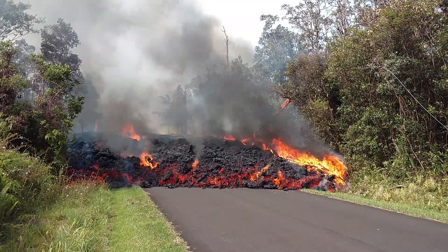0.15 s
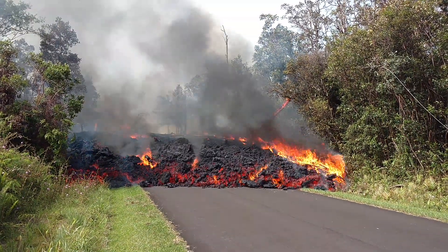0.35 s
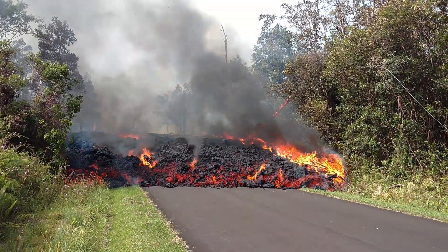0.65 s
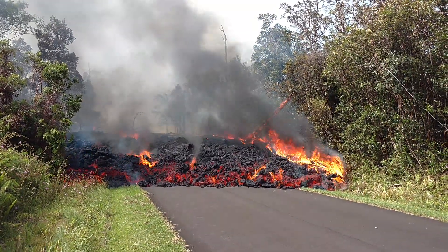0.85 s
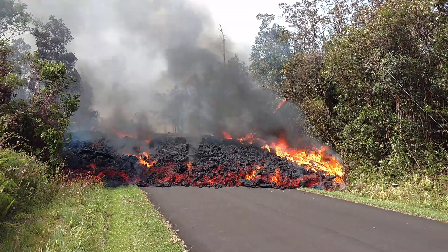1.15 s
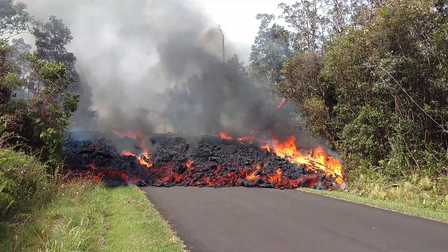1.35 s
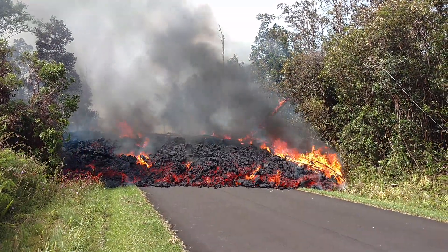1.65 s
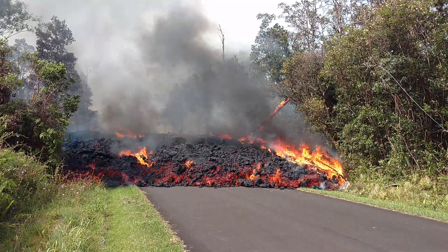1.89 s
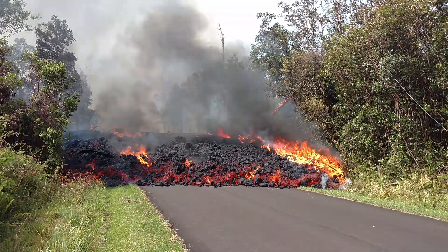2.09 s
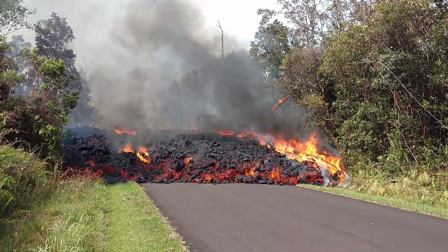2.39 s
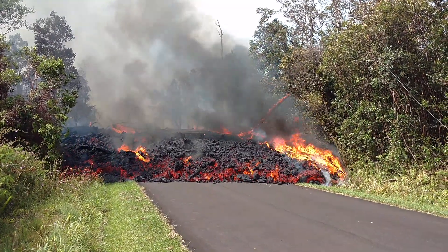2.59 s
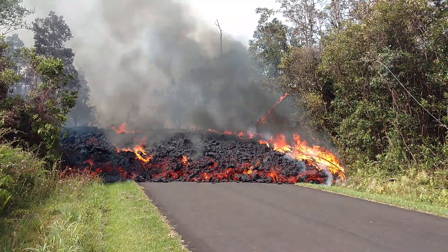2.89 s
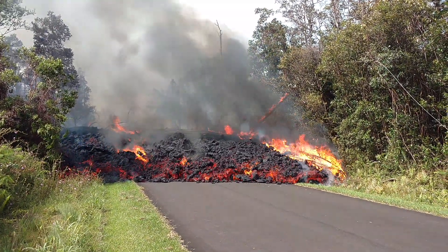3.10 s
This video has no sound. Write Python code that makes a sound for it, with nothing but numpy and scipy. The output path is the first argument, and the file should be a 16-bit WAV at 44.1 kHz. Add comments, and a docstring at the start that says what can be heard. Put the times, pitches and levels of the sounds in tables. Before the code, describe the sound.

Fire at the edge of a lava flow gives a flickering bright hiss and muffled roar, peppered with irregular clicks, snaps and dull pops, while wind rumbles mostly on the right; open air, wide stereo microphone.

```python
"""A fire roars softly and hisses as a lava flow creeps across a country road and burns the brush at its edge.
Flickering bands of noise make the roar and hiss; wind rumbles and buffets the right microphone port.
Resonant clicks crackle, noise bursts snap as twigs, and short wavering tones with puffs of noise pop as gas.
Foliage scatters these cracks; the recorder widens the stereo by subtracting each port from the other."""
import sys
import numpy as np
from scipy import signal
from scipy.fft import rfft, irfft, next_fast_len
from scipy.io import wavfile

SR = 44100
rng = np.random.default_rng(int(sys.argv[2]) if len(sys.argv) > 2 else 0)


def transcribe(signal):
    """Save signal, clipped to [-1, 1], as a 16-bit WAV file at the path in sys.argv[1]."""
    frames = np.atleast_2d(signal).T
    limited = np.clip(frames, -1, 1)
    pcm = np.round(limited * 32767).astype(np.int16)
    wavfile.write(sys.argv[1], SR, pcm)


N = 142884

# Level of the hiss and roar, dipping abruptly after some sharp clicks and recovering,
# before the two offsets below: time_s, hiss_level_db, roar_level_db
FIRE_LEVEL = [(0, -39.5, -42.5), (0.06, -39, -46), (0.12, -42, -46), (0.19, -35.5, -40),
              (0.32, -42.5, -43.5), (0.45, -40, -41), (0.62, -38.5, -39.5), (0.82, -34.5, -36.5),
              (1.02, -36, -40.5), (1.07, -40.5, -41), (1.25, -37, -40.5), (1.58, -34, -38),
              (1.815, -37, -42), (1.84, -42, -43.5), (2.1, -39.5, -41), (2.445, -39, -42), (2.47, -43, -46),
              (2.8, -41.5, -42.5), (3.14, -36.5, -39.5), (3.24, -37, -41.5)]
HISS_OFFSET_DB, ROAR_OFFSET_DB = -3, -3
# Relative noise density of the hiss: frequency_hz, density_db (per Hz)
HISS_SPECTRUM = [(1200, -13), (2000, -8.5), (2500, -1), (3100, 2), (4200, -1.5), (6500, 0.5), (9000, -3.5),
                 (10600, -5.5), (13500, -8), (15500, -17)]
# Relative noise density of the roar: frequency_hz, density_db (per Hz)
ROAR_SPECTRUM = [(40, -27), (110, 14.5), (250, -2.5), (520, 9), (760, 1.5), (1030, 2), (1300, -1),
                 (1580, 1), (1950, -1.5), (3000, -85)]
# Likeness of the fire noise at the two ports: frequency_hz, coherence (no unit)
PORT_COHERENCE = [(100, 0.73), (550, 0.98), (1000, 0.77), (1600, 0.1), (2400, 0.016), (3000, 0.13),
                  (4300, 0.012), (15000, 0.011)]

# Relative noise density of the wind rumble: frequency_hz, density_db (per Hz)
WIND_SPECTRUM = [(25, -41), (50, -2), (100, 3.5), (170, 3.5), (280, -5.5), (450, -22.5), (800, -39),
                 (2000, -34)]
# Strength of the moving air at the right port, before its flutter: time_s, level_db
BREEZE_LEVEL = [(0, -33.5), (.5, -29), (.9, -32.5), (1.15, -27.5), (1.35, -32), (1.55, -35), (1.98, -43),
                (2.08, -32), (2.23, -31.5), (2.37, -34), (2.52, -44.5), (2.72, -42), (2.79, -39.5),
                (2.94, -40.5), (3.05, -34.5), (3.24, -38.5)]
WIND_FLUTTER_DB, WIND_FLUTTER_HZ = 2.5, 38
WIND_LEFT_DB = -8   # left port relative to right

CRACKLES_PER_S, CRACKLE_CYCLES = 600, 9.6   # mean rate; bandwidth is 2 * pitch / cycles
CRACKLE_DB = -11   # relative to the hiss curve
CRACKLE_SPREAD_DB, CRACKLE_TILT_DB = 3.5, -3.5   # mean excess of size; slope per octave
ECHO_DB, ECHO_DECAY_S, ECHO_RISE_S, ECHO_HZ = -17.5, 0.047, 0.0017, 5050   # scatter from the trees

# Twigs snapping: start_s, level_db (relative), centre_hz, splintering_s (decay before the resonance)
TWIG_SNAPS = [(0.019, -32.5, 7000, 0.0011), (.037, -28.5, 8400, 0.0012), (0.065, -35, 6300, 0.0046),
              (0.1466, -32, 8400, 0.00061), (0.1969, -20, 1990, 0.0002), (.55, -32.5, 3840, 0.0043),
              (0.76, -31.5, 3660, 0.0087), (1.028, -25, 3740, 0.0032), (1.3058, -28, 2650, 0.0016),
              (1.41, -28.5, 3300, 0.0044), (1.556, -25.5, 7550, 0.0011), (1.613, -26, 7600, 0.00076),
              (1.73, -26, 7060, 0.0008), (1.8253, -20.5, 4400, 0.00038), (1.8802, -23.5, 4140, 0.00037),
              (2.2474, -24, 5000, 0.00025), (2.2642, -20, 3800, 0.00013), (2.4552, -26.5, 6230, 0.0004),
              (2.7433, -31.5, 6300, .0004), (3.1975, -18, 2520, 0.0006)]
SNAP_WIDTH = 1   # bandwidth as a share of the centre frequency
SNAP_CLICK_DB = 10.5   # the first break over the initial splinter noise
SNAP_PAN_DB, SNAP_LAG_S = 9.5, 0.00014   # loss and delay at the right port

# Eddies striking the right port: middle_s, level_db (before BUFFET_DB and flutter),
# centre_hz (before its wobble), half_length_s (standard deviation of the swell)
EDDY_BUFFETS = [(0.035, -23, 117.6, 0.0064), (0.063, -21, 174, 0.0057), (0.088, -20, 117, 0.0048),
                (0.249, -25, 182, 0.0073), (0.271, -10.5, 181, 0.0032), (0.304, -21.5, 234, 0.0048),
                (0.317, -17.5, 164, 0.0055), (0.333, -20, 159.7, 0.0083), (0.403, -28.5, 190, 0.0096),
                (0.44, -18.5, 222, 0.005), (0.478, -17.5, 194.4, 0.0032), (0.522, -22.5, 122.4, 0.015),
                (0.599, -21, 166, 0.0087), (0.666, -27, 100, 0.0085), (0.714, -17, 105, 0.0051),
                (0.835, -17, 121.7, 0.0087), (0.964, -17, 262, 0.0032), (0.978, -13.5, 149, 0.0056),
                (1.037, -17, 201, 0.0023), (1.052, -24, 169, 0.0081), (1.219, -14, 236.5, 0.00081),
                (1.238, -19, 158.4, 0.013), (1.272, -14.5, 213, .0035), (2.066, -31, 182, 0.0074),
                (2.09, -24, 221, 0.0027), (2.112, -18, 156, .005), (2.182, -18.5, 133, .005),
                (2.216, -16.5, 146.4, 0.0083), (2.27, -31.5, 189, 0.0093)]
BUFFET_DB, BUFFET_FLUTTER_DB, BUFFET_FLUTTER_HZ = 3.5, 1.8, 190
BUFFET_WOBBLE, BUFFET_WOBBLE_HZ = 0.59, 232   # limit of the pitch's log ratio; its rate
BUFFET_LOW_HZ = 73   # high-pass corner

# Gas pockets and green wood popping: start_s, level_db (before the ring and puff offsets),
# pitch_hz (before its waver), decay_s
GAS_POPS = [(0.307, -23, 880, 0.0024), (0.495, -33, 1534, 0.0096), (.714, -21, 1120, 0.0037),
            (0.7506, -21, 1020, 0.0045), (0.915, -29.5, 1000, 0.0047), (1.41, -24.5, 935, 0.0024),
            (1.418, -23.5, 3150, 0.0062), (1.419, -28.5, 6500, 0.0061), (1.932, -21, 940, 0.0025),
            (1.934, -28.5, 1540, 0.0074), (1.933, -31, 4020, 0.014), (1.971, -32.5, 1407, 0.0084),
            (2.206, -23, 660, 0.0029), (2.657, -30.5, 940, 0.0018), (3.1975, -19.5, 700, 0.0012)]
POP_RING_DB, POP_PUFF_DB = -3.5, -14.5
POP_WAVER_HZ, POP_WAVER_RATE_HZ = 68, 66   # rms depth; rate
POP_PUFF_WIDTH = 0.48   # bandwidth as a share of the pitch

PORT_LAG = 17   # samples of travel between the ports
# Subtraction of the opposite port: frequency_hz, share (no unit)
CROSSFEED_SHARE = [(100, 0.69), (1200, 0.8), (2300, 1), (2900, 1), (5200, 0.52), (9000, 0.53),
                   (13000, 0.37)]
# Colour of the two channels: frequency_hz, left_minus_right_db
CHANNEL_COLOUR = [(550, 0), (780, 2), (1100, 0), (2100, -2), (2400, 0), (2800, 0), (3200, -2), (4400, 3),
                  (5200, .3), (8500, 3), (10400, 1)]
CUTOFF_HZ = 15200


def from_db(db):
    """Amplitude ratio: 20 dB is a factor of ten."""
    return 10 ** (np.asarray(db) / 20)


def rms_one(x):
    """Normalization: the root mean square becomes 1."""
    return x / np.sqrt(np.mean(x ** 2) + 1e-20)


def in_time(rows):
    """Linear interpolation: each column of a curve at every sample."""
    s, *columns = np.transpose(rows)
    return [np.interp(np.arange(N) / SR, s, column) for column in columns]


def at_hz(points, hz):
    """Spectral interpolation: straight lines on a log-frequency axis."""
    point_hz, values = np.transpose(points)
    return np.interp(np.log(hz), np.log(point_hz), values)


def drift(rate_hz):
    """Low-pass noise: a smooth random wander with spread about 1."""
    step, settling = 40, 2000   # the wander is drawn every 40 samples
    r = np.exp(-2 * np.pi * rate_hz * step / SR)
    white = rng.standard_normal(N // step + settling + 2)
    slow = signal.lfilter([1], [1, -2 * r, r * r], white)[settling:]
    return np.interp(np.arange(N) / step, np.arange(len(slow)), rms_one(slow))


def resonate(x, hz, width_hz):
    """Resonance: a pole pair rings at one frequency, with a peak gain near 1."""
    r = np.exp(-np.pi * width_hz / SR)
    zeros = np.array([1, 0, -1]) * (1 - r * r) / 2
    poles = [1, -2 * r * np.cos(2 * np.pi * hz / SR), r * r]
    return signal.lfilter(zeros, poles, x + 1e-18)


def add(out, s, sound):
    """Superposition: a short sound is summed in at its start time."""
    i = max(int(s * SR), 0)
    out[..., i:i + sound.shape[-1]] += sound[..., :max(N - i, 0)]


def fire_noise(spectrum, flicker_db, flicker_hz, shared):
    """Turbulent combustion: partly coherent third-octave noise flickers, partly in unison; rms 1."""
    out, together = 0, drift(flicker_hz)
    edges = 16000 / 2 ** (np.arange(27, -1, -1) / 3)
    white = rng.standard_normal((2, 2, N))   # neighbouring bands use independent pairs
    for k, (low, high) in enumerate(zip(edges, edges[1:])):
        hz = np.sqrt(low * high)
        if not spectrum[0][0] < hz < spectrum[-1][0]:
            continue
        band = signal.butter(2, [low, high], "band", fs=SR, output="sos")
        mid, side = signal.sosfilt(band, white[k % 2])
        alike = np.clip(at_hz(PORT_COHERENCE, hz), -1, 1)
        flicker = shared * together + drift(flicker_hz)
        gain = from_db(at_hz(spectrum, hz) + flicker_db * flicker)
        ports = np.sqrt(1 + alike) * mid + np.sqrt(1 - alike) * side * [[1], [-1]]
        out = out + gain * ports
    return rms_one(out)


def wind_rumble():
    """Turbulent pressure: low-frequency noise fluctuates with the breeze, stronger at the right port."""
    hz = np.maximum(np.fft.rfftfreq(N, 1 / SR), 1)
    spectrum = rfft(rng.standard_normal((2, N))) * from_db(at_hz(WIND_SPECTRUM, hz))
    rumble = rms_one(irfft(spectrum, N))
    breeze_db = in_time(BREEZE_LEVEL)[0] + WIND_FLUTTER_DB * drift(WIND_FLUTTER_HZ)
    return rumble * from_db(breeze_db) * from_db([[WIND_LEFT_DB], [0]])


def crackle():
    """Impulse excitation: many tiny fractures ring at varied pitches, sizes and directions; rms 1."""
    out, count, pitches = np.zeros((2, N)), 400, 20
    for hz in np.geomspace(900, 12000, num=pitches):
        chance, when, where, sign = rng.random((4, count))
        excess = np.minimum(rng.exponential(1, count), 4.5)
        size = from_db(CRACKLE_SPREAD_DB * excess) * np.sign(sign - .5)
        size *= chance < CRACKLES_PER_S * N / SR / pitches / count   # the rest stay silent
        i = (when * (N - 2 * PORT_LAG)).astype(int) + PORT_LAG
        lag = ((2 * where - 1) * PORT_LAG).astype(int)
        clicks = np.zeros((2, N))
        clicks[0, i] = size
        clicks[1, i + lag] = size
        tilt = from_db(CRACKLE_TILT_DB * np.log2(hz / 1000))
        out += resonate(clicks, hz, 2 * hz / CRACKLE_CYCLES) * tilt
    return rms_one(out)


def tree_scatter(x):
    """Diffuse scattering: foliage on both sides returns a short, dull, decaying tail."""
    t = np.arange(SR // 2) / SR
    envelope = np.exp(-t / ECHO_DECAY_S) * (1 - np.exp(-t / ECHO_RISE_S))
    tail = rng.standard_normal((2, len(t))) * envelope
    tail = signal.sosfilt(signal.butter(1, ECHO_HZ, fs=SR, output="sos"), tail)
    tail /= np.sqrt(np.sum(tail ** 2) / 2)
    return from_db(ECHO_DB) * signal.fftconvolve(x, tail, axes=1)[:, :N]


def burst(hz, width, decay_s, click=0):
    """Sudden release: an impulse and dying noise excite one resonance of normalized energy."""
    t = np.arange(SR // 10) / SR
    push = rng.standard_normal(len(t)) * np.exp(-t / decay_s)
    push[0] -= click
    sound = resonate(push, hz, width * hz)
    energy = max(decay_s, .001) * SR
    return sound * np.sqrt(energy / np.sum(sound ** 2))


def snaps():
    """Brittle fracture: a break and splinters, differing by port, arrive first and louder at the left."""
    out = np.zeros((2, N))
    for s, db, hz, decay_s in TWIG_SNAPS:
        for port in range(2):
            crack = burst(hz, SNAP_WIDTH, decay_s, click=from_db(SNAP_CLICK_DB))
            add(out[port], s + port * SNAP_LAG_S, from_db(db - port * SNAP_PAN_DB) * crack)
    return out


def wind_buffets():
    """Vortex impact: each eddy swings the right port's pressure to and fro in a brief swell."""
    t = np.arange(-SR // 40, SR // 40) / SR
    eddies = np.zeros(N)
    wobble = np.exp(BUFFET_WOBBLE * np.tanh(drift(BUFFET_WOBBLE_HZ)))
    for s, db, centre_hz, half_s in EDDY_BUFFETS:
        pitch_hz = centre_hz * wobble[int(s * SR):][:len(t)]
        turns = rng.random() + np.cumsum(pitch_hz) / SR
        swell = np.exp(-.5 * (t / half_s) ** 2)
        eddy = np.sqrt(2) * np.sin(2 * np.pi * turns) * swell
        add(eddies, s + t[0], from_db(db + BUFFET_DB) * eddy)
    eddies *= from_db(BUFFET_FLUTTER_DB * drift(BUFFET_FLUTTER_HZ))
    high_pass = signal.butter(1, BUFFET_LOW_HZ, "high", fs=SR, output="sos")
    return np.array([np.zeros(N), signal.sosfilt(high_pass, eddies)])


def pops():
    """Cavity resonance: a puff of gas and a briefly ringing, wavering tone, equal at both ports."""
    out, waver_hz = np.zeros(N), POP_WAVER_HZ * drift(POP_WAVER_RATE_HZ)
    for s, db, hz, decay_s in GAS_POPS:
        pitch_hz = hz + waver_hz[int(s * SR):][:SR // 10]
        t = np.arange(len(pitch_hz)) / SR
        ring = np.sin(2 * np.pi * np.cumsum(pitch_hz) / SR) * np.exp(-t / decay_s)
        add(out, s, from_db(db + POP_RING_DB) * ring)
        add(out, s, from_db(db + POP_PUFF_DB) * burst(hz, POP_PUFF_WIDTH, decay_s))
    return np.array([out, out])


def scene():
    """Superposition: the fire, its scattered cracks and the wind add at the two ports."""
    hiss_db, roar_db = in_time(FIRE_LEVEL)
    hiss = fire_noise(HISS_SPECTRUM, flicker_db=2.0, flicker_hz=23.4, shared=0.57)
    hiss *= from_db(hiss_db + HISS_OFFSET_DB)
    roar = fire_noise(ROAR_SPECTRUM, flicker_db=0.85, flicker_hz=48, shared=0.12)
    roar *= from_db(roar_db + ROAR_OFFSET_DB)
    wind = wind_rumble() + wind_buffets()
    cracks = from_db(hiss_db + CRACKLE_DB) * crackle() + snaps() + pops()
    return hiss + roar + wind + cracks + tree_scatter(cracks)


def record(dry):
    """Pressure difference: each port minus the delayed other, coloured by channel and low-passed."""
    size = next_fast_len(N + SR // 10)
    hz = np.maximum(np.fft.rfftfreq(size, 1 / SR), 1)
    ports = rfft(dry, size)
    delay = np.exp(-2j * np.pi * hz * PORT_LAG / SR)
    cross = np.clip(at_hz(CROSSFEED_SHARE, hz), 0, 1) * delay
    colour = from_db(at_hz(CHANNEL_COLOUR, hz) * np.array([[.5], [-.5]]))
    wide = irfft(colour * (ports - cross * ports[::-1]), size)[:, :N]
    low_pass = signal.ellip(10, .2, 80, CUTOFF_HZ, fs=SR, output="sos")
    return signal.sosfilt(low_pass, wide)


dry = scene()
out = record(dry)
transcribe(out)
```